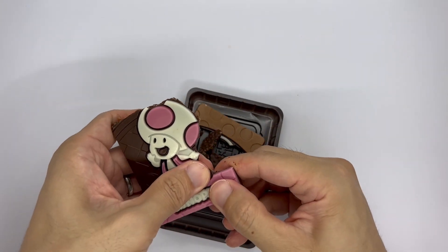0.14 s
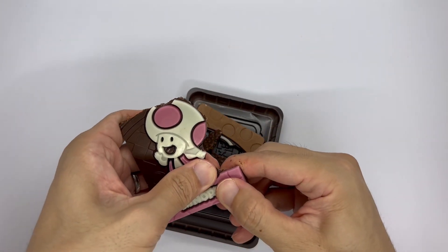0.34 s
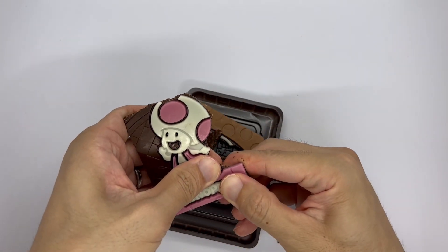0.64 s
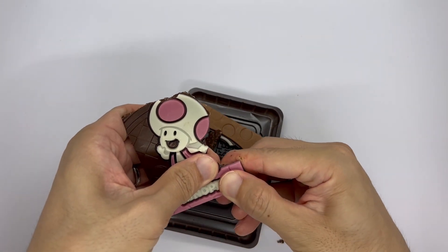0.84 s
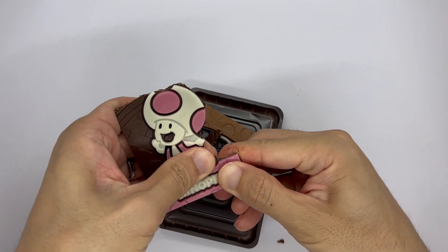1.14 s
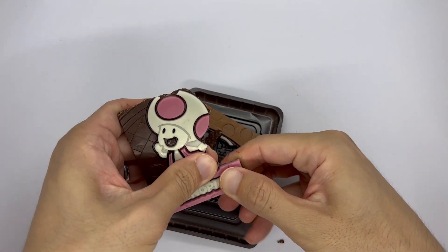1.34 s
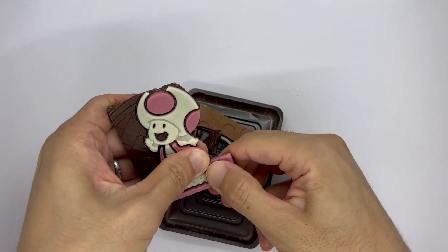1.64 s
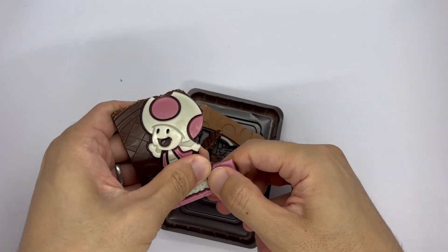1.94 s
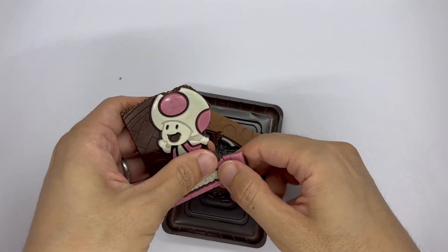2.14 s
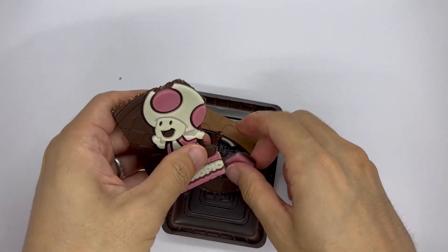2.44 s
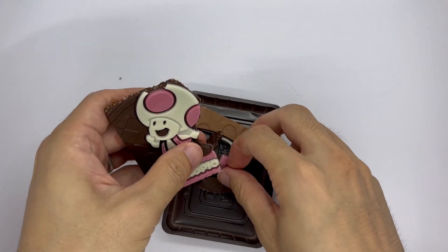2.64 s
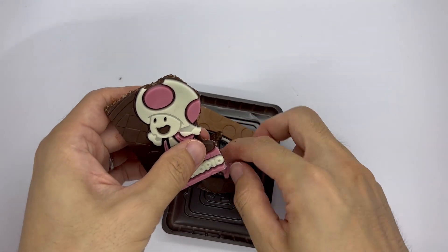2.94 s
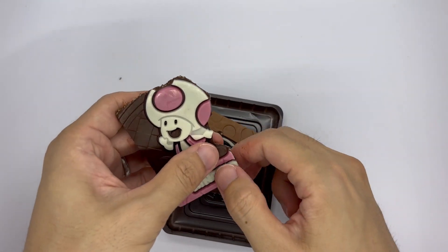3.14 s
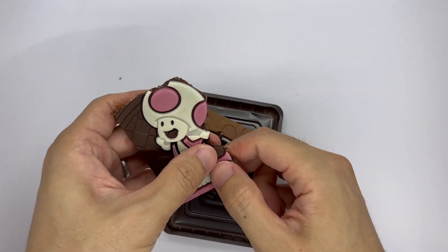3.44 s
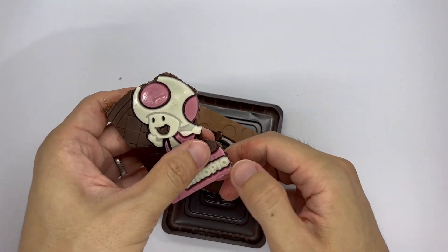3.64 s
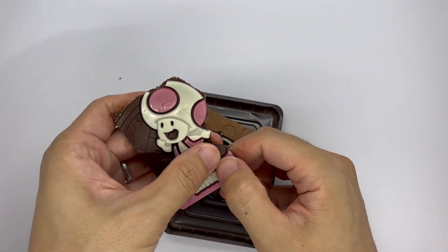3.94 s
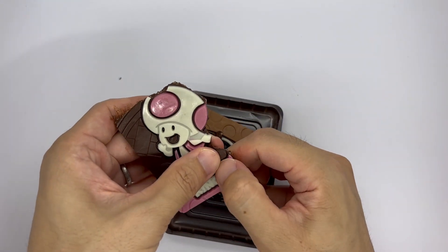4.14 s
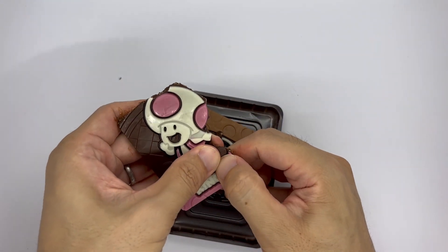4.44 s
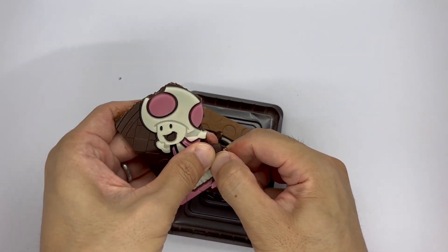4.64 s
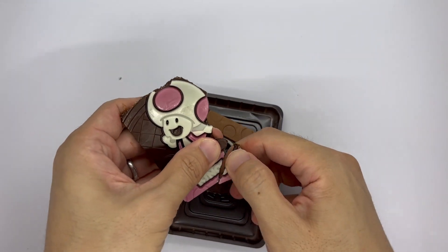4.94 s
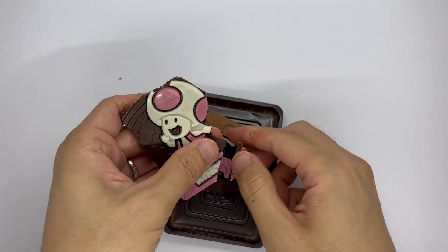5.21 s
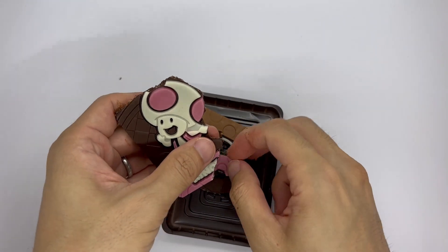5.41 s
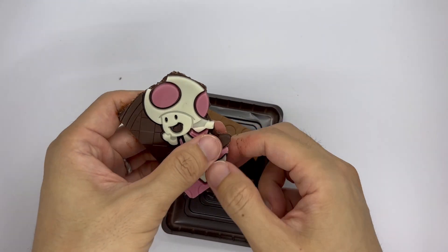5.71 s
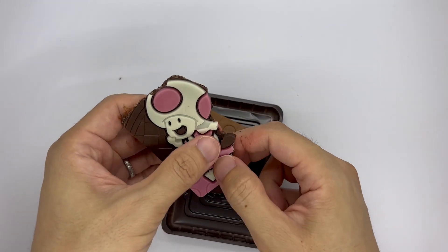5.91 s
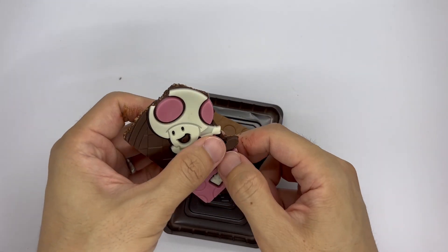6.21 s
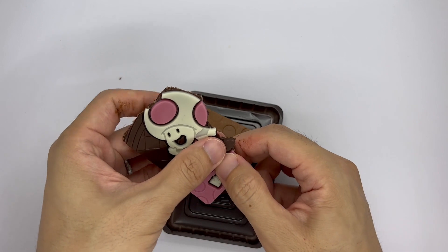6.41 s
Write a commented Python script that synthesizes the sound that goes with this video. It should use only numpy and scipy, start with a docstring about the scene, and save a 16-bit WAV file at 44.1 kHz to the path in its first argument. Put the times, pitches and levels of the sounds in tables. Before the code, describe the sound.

Fingers bend a thin chocolate slab close to the microphone: faint ticks, a light patter on a plastic tray, then sharp brittle snaps. A piece knocks the tray, near quiet follows with one soft scuff, then another loud snap and a busy crunchy clatter. Small quiet room, short reverberation, stereo, faint hiss and low table hum.

```python
"""Snapping a thin chocolate slab

Fingers break small pieces off a moulded slab above a plastic tray on a table, in a small quiet room.
Fractures and knocks excite damped modes of slab, tray and table; rubbing and crunching are grains of noise,
a hand brushes the table, and the table hums low under the forearms.
All is heard in stereo, close by, over a faint noise floor."""
import sys
import numpy as np
from scipy import signal
from scipy.fft import rfft, irfft, next_fast_len
from scipy.io import wavfile
from scipy.ndimage import uniform_filter1d

SR = 44100
rng = np.random.default_rng(int(sys.argv[2]) if len(sys.argv) > 2 else 0)


def bounce(signal):
    """Save signal as a 16-bit WAV file at the path given by the first command-line argument."""
    frames = np.transpose(np.atleast_2d(signal))
    limited = np.clip(frames, -1, 1)
    pcm = np.round(limited * 32767).astype(np.int16)
    wavfile.write(sys.argv[1], SR, pcm)


N = 289737  # samples
T = np.arange(N) / SR  # s


def undb(db):
    """Level definition: decibels to an amplitude ratio."""
    return 10 ** (np.asarray(db) / 20)


def unit(x):
    """Normalisation to an RMS of 1."""
    return x / np.sqrt(np.mean(x ** 2))


def read(table, hz):
    """Logarithmic interpolation: a (f/Hz, value) table read on a log-frequency axis."""
    f, v = np.transpose(table)
    return np.interp(np.log(hz + 1), np.log(f + 1), v)


def colour(x, table):
    """Linear filtering: the spectrum is weighted by a (f/Hz, level/dB) table."""
    n = next_fast_len(len(x))
    gain = undb(read(table, np.fft.rfftfreq(n, 1 / SR)))
    return irfft(rfft(x, n) * gain, n)[:len(x)]


def walk(rate):
    """Slow random fluctuation: levels held 1 / rate seconds, then smoothed twice over that time."""
    k = int(SR / rate)
    steps = np.repeat(rng.standard_normal(N // k + 1), k)
    return uniform_filter1d(uniform_filter1d(steps, k), k)[:N]


def pair(n, likeness):
    """Partial coherence: two noises share a part of their power that depends on frequency."""
    shared = [(f, 10 * np.log10(min(c, .99))) for f, c in likeness]
    separate = [(f, 10 * np.log10(1 - min(c, .99))) for f, c in likeness]
    common = colour(rng.standard_normal(n), shared)
    return [common + colour(rng.standard_normal(n), separate) for _ in range(2)]


def stroke(start, end, start_db, end_db, rise_db_s, fall_db_s):
    """Gesture envelope: exponential onset and release about two corners; crossed corners make a brief scrape."""
    level = np.interp(T, [start, end], [start_db, end_db])
    onset = rise_db_s * np.maximum(start - T, 0)
    release = fall_db_s * np.maximum(T - end, 0)
    return undb(level - onset - release)


def blow(modes, push, tilt_db=0):
    """Modal superposition: a push rings damped modes, each a little detuned and reweighted at random."""
    hz, db, t60 = np.transpose(modes)
    chance = rng.standard_normal((2, len(hz)))
    t = np.arange(SR // 5)[:, None] / SR
    db = db + chance[0] + tilt_db * np.log2(hz / hz.mean())  # tilt in dB per octave
    turn = (-1) ** np.arange(len(hz))  # neighbours in opposite sense fill the valleys between them
    detuned = hz * (1 + 0.031 * chance[1])
    ring = turn * undb(db - 60 * t / t60) * np.sin(2 * np.pi * detuned * t)
    y = signal.fftconvolve(push, ring.sum(axis=1))
    loudest = uniform_filter1d(y ** 2, size=150).max()  # mean square over 3.4 ms
    return y / np.sqrt(2 * loudest)


def fracture(length_s, main=1.3, rise_s=0.001):
    """Brittle fracture: a main break in a shower of micro-breaks; a weaker, longer tail runs beneath it."""
    t = np.arange(SR // 10) / SR
    sizes = rng.standard_normal(len(t)) * undb(2.0 * rng.exponential(size=len(t)))
    long_tail = undb(-21.5) * np.exp(-t / (5 * length_s))
    shower = sizes * (1 - np.exp(-t / rise_s)) * (np.exp(-t / length_s) + long_tail)
    shower[int(.0012 * SR)] = main * np.linalg.norm(shower)  # main is relative to the whole shower
    return shower


def add(out, y, s, pan_db):
    """Level panning: a sound placed by its left minus right level."""
    i = int(s * SR)
    y = y[:N - i]
    out[:, i:i + len(y)] += y * undb([[pan_db / 2], [-pan_db / 2]])


# relative spectrum of room and microphone noise: (f/Hz, level/dB per Hz)
AIR = [(18, -51), (30, -32.5), (47, -12), (71, -6), (170, -17.5), (210, -11.5), (245, -19), (449, -27),
       (540, -28.5), (632, -28.5), (1220, -36.5), (7270, -52.5), (9970, -54), (13300, -47), (16000, -64)]
# coherence of that noise: (f/Hz, share of power common to left and right)
AIR_LIKENESS = [(100, 0.96), (400, 0.71), (1500, 0.092), (5000, 0.79), (10000, 0.88), (14000, 0.39)]
AIR_DB = -66.5


def air():
    """Random noise floor: shaped noise, partly coherent in stereo, wandering slightly in level."""
    noise = np.array([colour(n, AIR) for n in pair(N, AIR_LIKENESS)])
    return unit(noise) * undb(AIR_DB + walk(2.3))


# load of the arms on the table: (t/s, hum level/dB)
ARMS = [(0.0, -61), (0.4, -69), (0.77, -67.5), (0.91, -53.5), (1.1, -68), (1.45, -60), (1.72, -55),
        (1.9, -64), (2.1, -58), (2.45, -66), (2.78, -55), (3.1, -76), (4.2, -70.5), (4.57, -58.5),
        (5.38, -60), (5.8, -57), (6.17, -60), (6.419, -59)]


def table_hum():
    """Forced resonance: muscle tremor shakes the table top at its lowest resonance."""
    s, db = np.transpose(ARMS)
    resonance = [(25, -27.0), (50, -10), (66, 3.0), (85, -11), (140, -19), (300, -59.5)]
    hum = colour(rng.standard_normal(N), resonance)
    return unit(hum) * undb(np.interp(T, s, db))


# reverberation time of the room: (f/Hz, t60/s)
ROOM = [(150, 0.25), (1000, 0.36), (4000, 0.3), (14000, 0.13)]
# coherence of the reverberation: (f/Hz, share of power common to left and right)
ROOM_LIKENESS = [(100, .9), (600, 0.17), (3000, 0.64), (9000, 0.65), (14000, 1)]
ROOM_DB = -10.5  # tail energy against the near sound


def room(x):
    """Diffuse reverberation: decaying noise tails, one for each channel, the high treble dying first."""
    t = np.arange(SR // 3) / SR
    f, frames, _ = signal.stft(t, SR, nperseg=256)
    fall = undb(-60 * frames / read(ROOM, f)[:, None])
    fall = fall * (frames > .004)  # the tail begins after a short gap
    source = x.mean(axis=0)
    out = []
    for noise in pair(len(t), ROOM_LIKENESS):
        spectrum = signal.stft(noise, SR, nperseg=256)[2]
        tail = signal.istft(spectrum * fall, SR, nperseg=256)[1]
        out.append(signal.fftconvolve(source, tail / np.linalg.norm(tail))[:N])
    return np.array(out)


BRUSH_S, BRUSH_DB, BRUSH_RISE_DB_S, BRUSH_FALL_DB_S = 3.766, -62.5, 750, 234


def brush():
    """Sliding friction: a hand brushes the table, a short dull scuff of band-limited noise."""
    spectrum = [(200, -37), (420, 11.0), (900, -12.0), (1400, -13.0), (2500, -38)]
    scuff = unit(colour(rng.standard_normal(N), spectrum))
    return scuff * stroke(BRUSH_S, BRUSH_S, BRUSH_DB, BRUSH_DB, BRUSH_RISE_DB_S, BRUSH_FALL_DB_S)


# rubbing and crunching; crossed corners make a brief scrape:
# (onset corner t/s, release corner t/s, onset level/dB, release level/dB, top minus body level/dB)
RUBS = [(0.785, 0.803, -62.5, -58, -6.5), (0.865, 0.863, -70, -68.5, -8), (1.379, 1.368, -68, -66, 8.5),
        (1.427, 1.466, -67, -70, -15), (1.5, 1.573, -75.5, -75, -2), (1.905, 2.161, -70.5, -60, -2),
        (2.626, 2.68, -95, -93, 17), (2.807, 2.872, -72, -80, -14), (3.521, 3.514, -82, -75.5, 7.5),
        (4.56, 4.58, -97, -99, 11), (4.695, 4.788, -68.5, -70, -3), (4.828, 4.878, -65.5, -59.5, -6),
        (4.928, 4.999, -58.5, -66, 0), (5.439, 5.427, -43.5, -73, -13), (5.47, 5.54, -56, -78, -25),
        (5.616, 5.695, -64, -63.5, -10), (6.328, 6.332, -82, -86, 4), (6.371, 6.41, -84, -83.5, 9),
        (6.45, 6.566, -95.5, -96, 9)]
# relative spectrum of the body of the rubbing: (f/Hz, level/dB per Hz)
RUB = [(500, -28), (800, -15), (1350, 4.5), (2500, -4.5), (4800, 2), (5700, -4.5), (7500, 3.5), (10000, 1),
       (11500, -21)]
RISE_DB_S, FALL_DB_S = 803, 595.5  # how fast a stroke sets in and lifts off


def rubs():
    """Stick-slip friction: skin ridges catch and slip in dense uneven grains, which also serve as crunch."""
    unevenness_db = 2 * rng.exponential(size=N) + 2 * walk(42)
    grains = rng.standard_normal(N) * undb(unevenness_db)
    body = unit(colour(grains, RUB))
    top = unit(colour(grains, [(9500, -47.0), (11000, 14.0), (13000, 6.5), (16000, 3)]))
    out = np.zeros(N)
    for onset, release, onset_db, release_db, top_db in RUBS:
        gain = stroke(onset, release, onset_db, release_db, RISE_DB_S, FALL_DB_S)
        out += gain * (body + top * undb(top_db))
    return out * undb([[1.5], [-1.5]])  # louder on the left


# strain ticks: (t/s, ring level/dB, fizz level/dB)
TICKS = [(0.045, -66, -78), (0.209, -91, -69), (0.336, -69, -78), (0.4631, -59, -63), (0.511, -59, -66),
         (0.5244, -78, -71), (0.5976, -54, -52), (0.7073, -59, -57.5), (0.8728, -51, -62),
         (0.9343, -60.5, -81), (1.0006, -57, -68), (1.061, -52, -60.5), (1.119, -67.5, -75),
         (1.187, -59, -61.5), (1.258, -75, -70), (1.2737, -74.5, -51.5), (1.934, -81, -45),
         (3.5215, -77, -59), (4.2287, -83, -69), (4.7624, -76, -60), (4.8264, -70, -50.5),
         (4.8635, -58, -59), (4.8804, -55, -68), (6.3266, -96, -68), (6.3683, -99, -60)]
# modes of the slab under a tick: (nominal f/Hz, mean level/dB, t60/s)
TICK = [(2420, 10, 0.0071), (2485, 3.5, 0.016), (2940, 4, 0.0048), (3560, 1.5, 0.014), (3450, 3.5, 0.0087)]
# stiff slab modes rung by fracture: (nominal f/Hz, mean level/dB before tilt, t60/s)
CRACK = [(2270, -6, 0.0019), (2565, -24.5, 0.0047), (2936, -17.5, .008), (3440, -2.5, 0.0028),
         (4130, 3.5, 0.0016), (4813, -1, 0.0033), (5190, -3, 0.0028), (6240, -8.5, 0.0047),
         (7080, -13.5, 0.0161), (7330, -5.5, 0.0045), (7720, -0.5, 0.0026), (9970, 1, 0.0012)]
# treble modes rung by fracture: (nominal f/Hz, mean level/dB, t60/s)
FIZZ = [(11700, -3, 0.0039), (10900, 0.5, 0.0088), (11110, 9, 0.0046), (12120, 7, 0.0061),
        (13700, -11, 0.0012), (14300, 5, 0.0028), (15200, 0, .003)]
TICK_PAN_DB = 2.5  # left minus right


def ticks():
    """Strain release: tiny single breaks in the slab, a click into its ring and a spit of treble."""
    out = np.zeros((2, N))
    click = np.diff(np.hanning(int(0.00023 * SR)))
    for s, ring_db, fizz_db in TICKS:
        ring = undb(ring_db) * blow(TICK, click)
        fizz = undb(fizz_db) * blow(CRACK[8:] + FIZZ, fracture(0.0022))
        add(out, ring + fizz[:len(ring)], s, TICK_PAN_DB)
    return out


# middle modes of the clack: (nominal f/Hz, mean level/dB before tilt, t60/s)
CLACK = [(1000, -4, .012), (1140, 0, .015), (1270, -1, .012), (1450, -2, .012), (1580, 0, .016),
         (1720, -2, .012), (1870, -2, .012), (2020, -2, .01)]
# lower modes of the knock: (nominal f/Hz, mean level/dB, t60/s)
KNOCK = [(475, -3, 0.034), (552, -6.5, 0.045), (671.6, -2.5, 0.073), (780, -8, 0.018), (870, -6, 0.017)]
# modes of the plastic tray: (nominal f/Hz, mean level/dB, t60/s)
TRAY = [(220.4, -9, 0.16), (259.8, -4, 0.05), (319.7, -8.5, 0.097), (396.5, -8.5, 0.079)]
# modes of the table: (nominal f/Hz, mean level/dB, t60/s)
TABLE = [(68.77, -0.2, 0.51), (93, -2, 0.29), (128, 0.59, 0.13), (169.8, -2.3, 0.18)]
CLACK_TILT_DB = -1  # per octave
HIT_PAN_DB, PAN_SCATTER_DB = 2.5, 1  # left minus right


def strike(out, s, shower, bright, crack, fizz, clack, knock, tray, table):
    """Impulse response: fracture rings the stiff modes; a jolt and a soft push ring the lower ones."""
    jolt = np.hanning(int(0.001 * SR))
    push = np.diff(np.hanning(int(0.0036 * SR)))  # pressed in, then springs back
    pan = HIT_PAN_DB + PAN_SCATTER_DB * rng.standard_normal()
    add(out, undb(crack) * blow(CRACK, shower, bright), s, pan)
    add(out, undb(fizz) * blow(FIZZ, shower), s, pan)
    add(out, undb(clack) * blow(CLACK, shower, CLACK_TILT_DB), s, pan)
    add(out, undb(knock) * blow(KNOCK, jolt), s + .001, pan)
    for modes, db in ((TRAY, tray), (TABLE, table)):
        add(out, undb(db) * blow(modes, push), s + 0.00088, 0.28 * pan)  # long waves: nearly equal levels


# snaps of the slab, and one dull tap at 1.594 s:
# (t/s, crack level/dB, brightness/dB per octave, clack level/dB, knock level/dB)
SNAPS = [(1.5942, -62.5, -8.5, -49.5, -57), (1.7377, -32.5, -3.6, -44, -36.5), (1.838, -39, 5.5, -83, -85),
         (2.2057, -45.5, 0.5, -52.5, -53), (4.6489, -33.5, -2.5, -40, -41)]
# slab and pieces knocking on the tray:
# (t/s, crack level/dB, brightness/dB per octave, clack level/dB, tray level/dB, table level/dB)
HITS = [(1.3704, -66, 4, -65, -48.5, -72), (1.3765, -56, -1, -57, -43.5, -77),
        (1.385, -56, -14, -54, -39, -46), (1.4174, -57.5, -6, -59, -53, -42),
        (1.4523, -55, 0, -55.5, -35.5, -50), (1.4602, -41.5, 1.5, -61, -47, -35.5),
        (1.4696, -52.5, -7, -54, -50.5, -38), (1.4833, -67, 0, -64, -51, -43.5),
        (1.5197, -60, 7, -76, -76, -63), (2.1671, -52, 5, -59, -79.5, -61),
        (2.723, -53.5, -5.5, -51, -32, -38), (2.7287, -51.5, -2, -57, -50, -45),
        (2.7482, -71, -9, -58, -45.5, -34), (2.7591, -37.5, -1, -43, -28, -49.5),
        (2.7715, -52, -11, -53, -40.5, -54), (2.7819, -58, -21, -62, -49.5, -49.5),
        (2.8162, -59, 4.5, -55.5, -52, -54), (2.832, -49.5, -5, -55, -43, -51.5),
        (2.8436, -48.5, -2.5, -51, -46.5, -45), (5.3531, -62, -2, -63, -36, -34),
        (5.4039, -45.5, 0.5, -47.5, -31.5, -49), (5.4158, -36, -2.5, -40.5, -28, -32),
        (5.4298, -58, -1, -53.5, -32, -54), (5.453, -42.5, -4.5, -40.5, -34, -38),
        (5.474, -29, -8, -34.5, -43, -47), (5.4882, -49.5, -6.5, -41, -44, -34.5),
        (5.506, -41, -3, -42, -40.5, -36), (5.5204, -51, -3.5, -43, -38, -40.5),
        (5.5306, -54, -11, -48.5, -43, -43), (5.6037, -49, -7.5, -48, -54, -60),
        (5.6242, -48.5, -8, -52, -55, -56.5), (5.6503, -59, 6, -70, -58, -50.5),
        (5.668, -52.5, 3.5, -61, -54, -51.5), (5.6916, -43, -2.5, -37.5, -48, -61.5),
        (5.697, -30, -3.5, -36, -27, -60), (5.7054, -37, -0.5, -35.5, -34.5, -39),
        (5.712, -44.5, 3.5, -46, -39.5, -50.5), (5.765, -60, 5, -57, -46, -76)]
# fracture length and rise in s; main break against the whole shower
SNAP_S, SNAP_RISE_S, SNAP_MAIN = 0.0031, 0.0017, 0.93
HIT_S, HIT_RISE_S, HIT_MAIN = 0.0049, 0.0013, 0.48
SNAP_FIZZ_DB, HIT_FIZZ_DB, FIZZ_PER_BRIGHT = -4, -6.5, 1.2  # against crack; dB per unit of brightness
SNAP_TRAY_DB, SNAP_TABLE_DB = -5, -15  # against the knock
KNOCK_SHARE, KNOCK_DB = 0.57, -6.5  # way from clack to tray level, then an offset


def hits():
    """Modal excitation: a snap shakes mostly the slab; a tray knock fizzes more the brighter it is."""
    out = np.zeros((2, N))
    for s, crack, bright, clack, knock in SNAPS:
        shower = fracture(SNAP_S, SNAP_MAIN, SNAP_RISE_S)
        fizz = crack + SNAP_FIZZ_DB
        strike(out, s, shower, bright, crack, fizz, clack, knock, knock + SNAP_TRAY_DB, knock + SNAP_TABLE_DB)
    for s, crack, bright, clack, tray, table in HITS:
        shower = fracture(HIT_S, HIT_MAIN, HIT_RISE_S)
        fizz = crack + HIT_FIZZ_DB + FIZZ_PER_BRIGHT * bright
        knock = clack + KNOCK_SHARE * (tray - clack) + KNOCK_DB
        strike(out, s, shower, bright, crack, fizz, clack, knock, tray, table)
    return out


def scene():
    """Superposition: near sources and their reverberation over the table hum and the noise floor."""
    near = brush() + rubs() + ticks() + hits()
    return air() + table_hum() + undb(ROOM_DB) * room(near) + near


# phase by which the left channel leads: (f/Hz, phase/rad)
LEAD = [(0, 0), (780, 0.6), (1290, -0.7), (1980, 0.0), (3450, 1.3), (5340, 0.3), (5860, -0.4), (7150, -0.1),
        (8530, -1.4), (9650, -3.0), (10900, -3.5), (12600, -5.9), (14400, -6.7), (16000, -9.4)]
# level difference of the channels: (f/Hz, left minus right level/dB)
LEVEL_DIFFERENCE = [(60, 1), (300, 1), (2000, 1.5), (5000, 4), (8000, -0.5), (14000, -2)]
TOP_HZ = 16200


def record(dry):
    """Stereo processing: phase and level differ between left and right with frequency; a low-pass cuts the top."""
    n = next_fast_len(N + 512)
    hz = np.fft.rfftfreq(n, 1 / SR)
    f, lead = np.transpose(LEAD)
    side = np.array([[.5], [-.5]])  # half of each difference to either channel
    phase = np.exp(1j * side * np.interp(hz, f, lead))
    gain = undb(side * read(LEVEL_DIFFERENCE, hz))
    wet = irfft(rfft(dry, n) * phase * gain, n)[:, :N]
    low_pass = signal.ellip(10, .2, 80, TOP_HZ, fs=SR, output="sos")
    return signal.sosfilt(low_pass, wet)


dry = scene()
out = record(dry)
bounce(out)
```